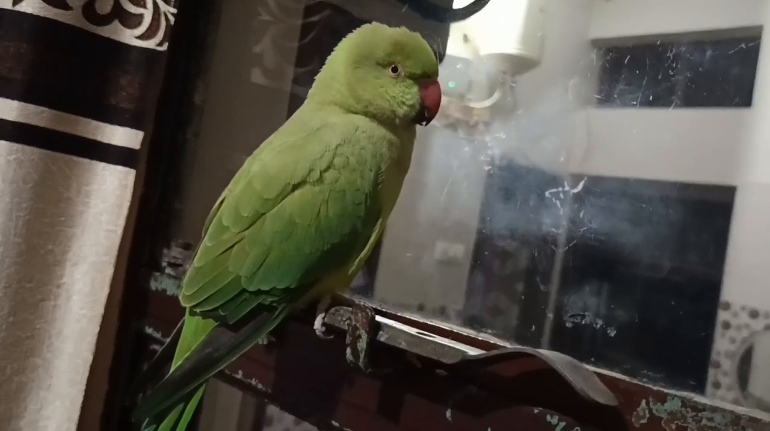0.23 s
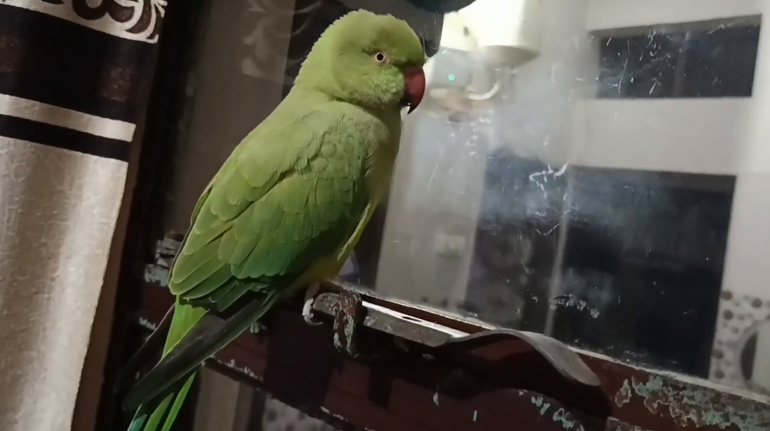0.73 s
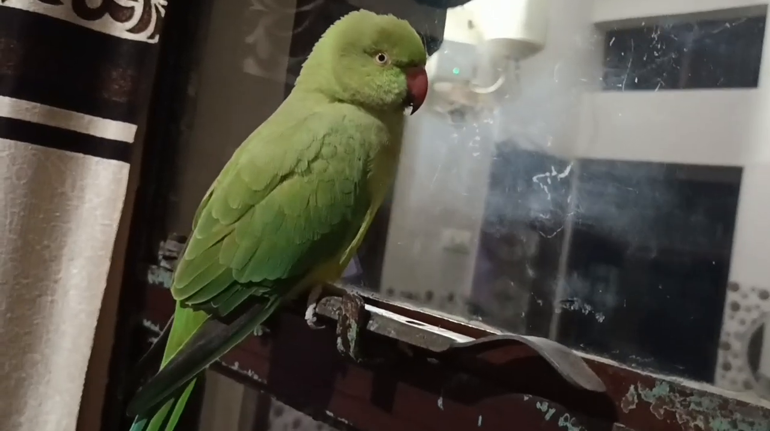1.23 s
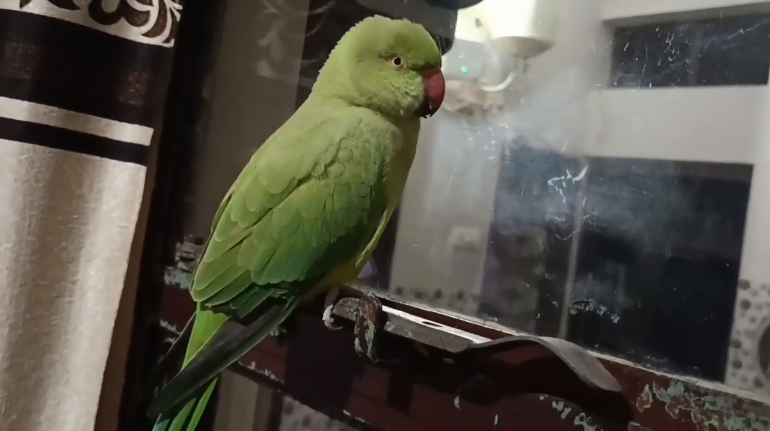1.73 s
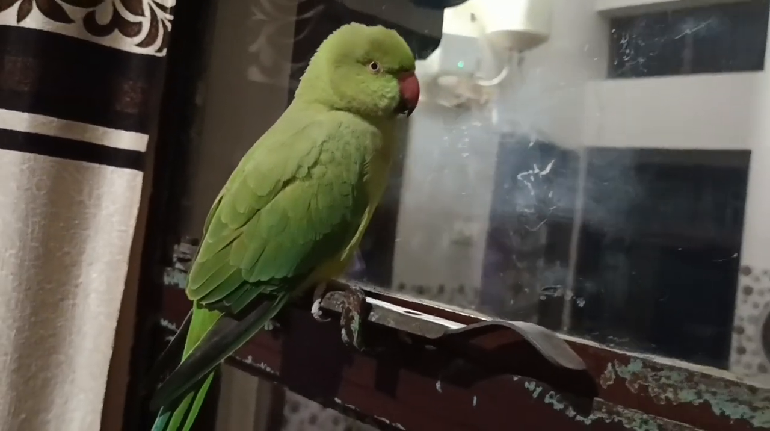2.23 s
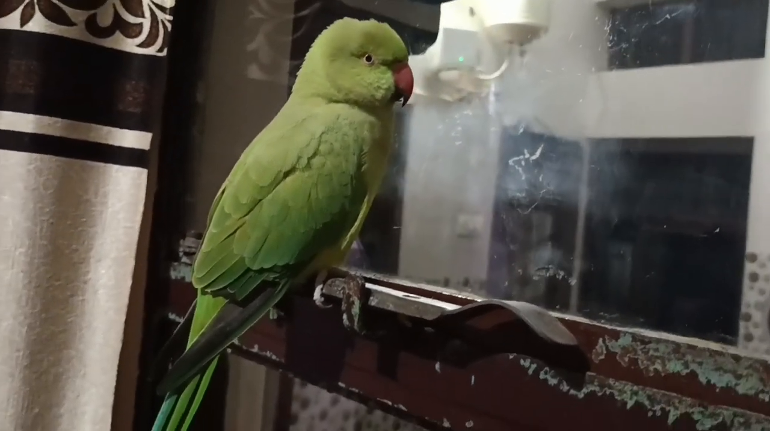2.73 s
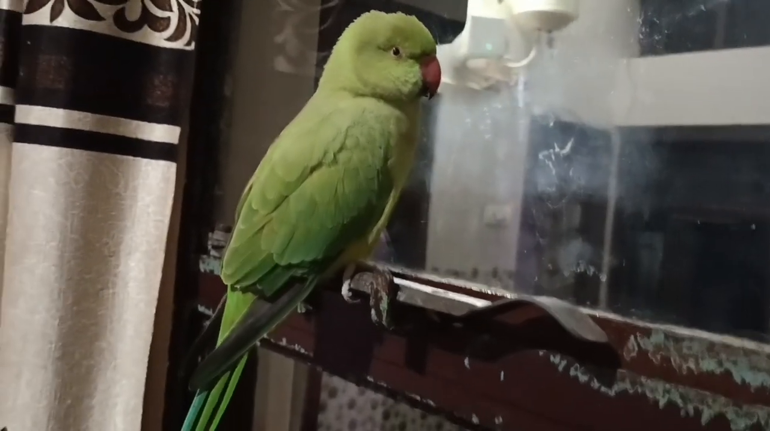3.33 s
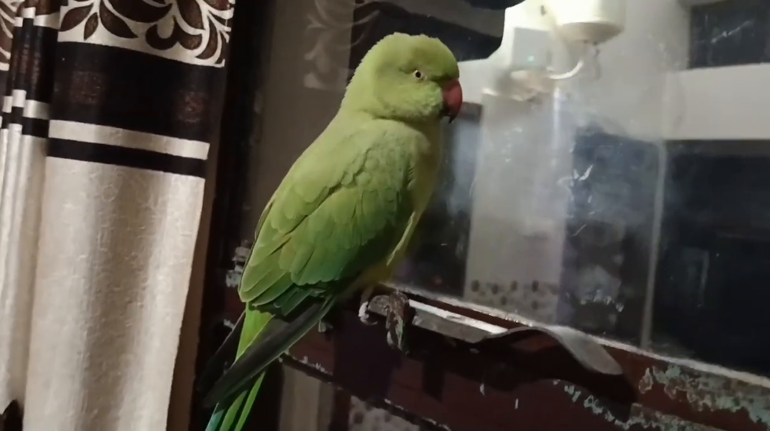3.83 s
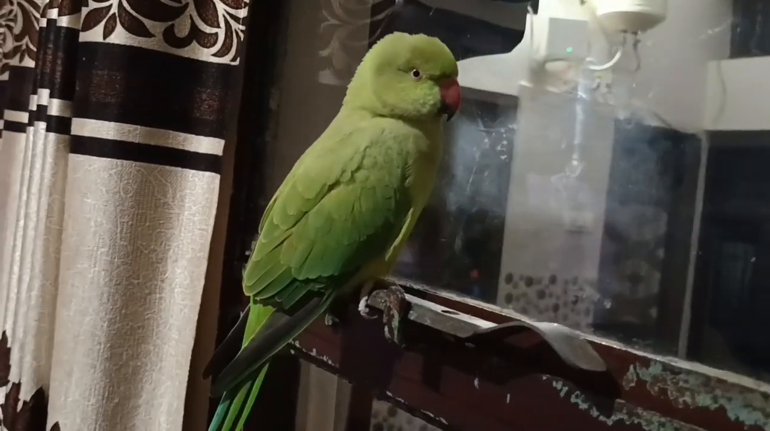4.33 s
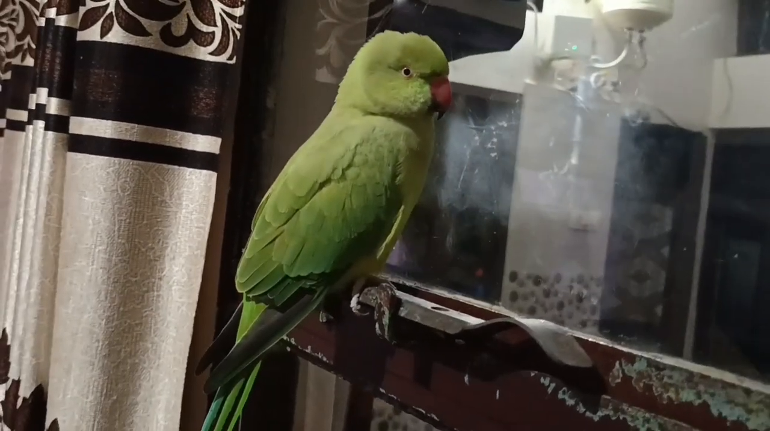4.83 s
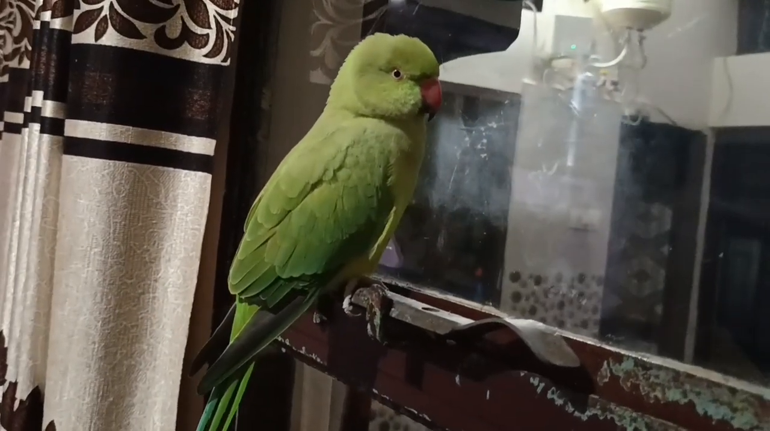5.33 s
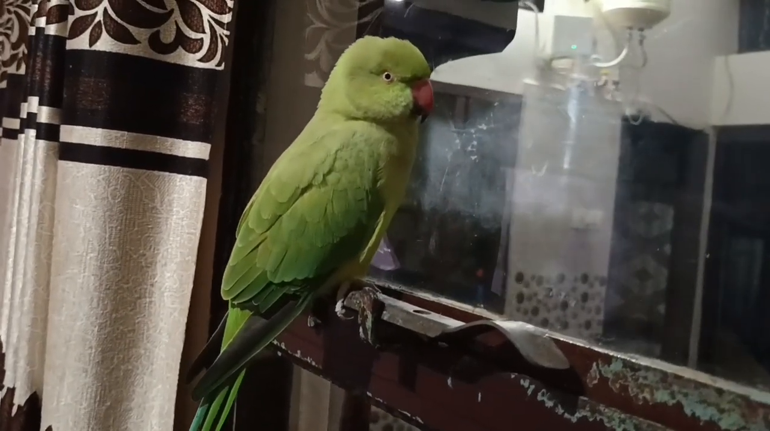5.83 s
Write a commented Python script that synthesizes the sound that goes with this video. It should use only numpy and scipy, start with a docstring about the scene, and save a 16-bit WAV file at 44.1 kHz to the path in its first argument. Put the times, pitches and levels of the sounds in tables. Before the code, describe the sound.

A parakeet indoors gives clear nasal calls, a harsh fluttering squawk, wheezes and a scooped whistle, with beak clicks over faint room rumble.

```python
"""A clear nasal parakeet note sounds first, over a low household rumble; three more notes, a fluttering squawk,
a scooped whistle, wheezes, pips, short knocks and beak clicks follow. Voiced calls are harmonic series whose
partials are weighted by beak resonances, wheezes are noise pulsed by the tongue, clicks are impulses ringing
resonances, pips and short knocks are windowed sinusoids.
A window pane behind the bird makes left and right differ, and a small room adds a decaying tail."""
import sys
import numpy as np
from scipy import signal
from scipy.fft import rfft, irfft, next_fast_len
from scipy.io import wavfile
from scipy.ndimage import uniform_filter1d, map_coordinates

SR = 44100
rng = np.random.default_rng(int(sys.argv[2]) if len(sys.argv) > 2 else 0)


def wrap_up_sound(samples):
    """Save the sound to the file named by the first command line argument, as 16-bit audio."""
    columns = np.atleast_2d(samples).T
    # keep every value between -1 and 1, then stretch to whole-number steps
    tamed = np.clip(columns, -1, 1)
    steps = np.round(tamed * 32767).astype(np.int16)
    wavfile.write(sys.argv[1], SR, steps)


N = 267687
TIME = np.arange(N) / SR  # s

# spectrum of the household noise, relative: f/Hz, level/dB
FLOOR = [(15, -62), (25, -32.5), (96, -0.5), (194, -2), (316, -7), (791, -10.5), (1180, -16), (2150, -22),
         (8270, -42), (10300, -35), (12500, -43.5), (15800, -51.5)]
# left-right correlation of the household noise: f/Hz, correlation
ALIKE = [(60, .92), (180, .95), (350, .7), (600, .4), (1650, .06)]
FLOOR_DB, SETTLES_DB_PER_S = -45, -0.2  # starting level, and its slow fall

# answer of the room: f/Hz, decay time t60/s, level/dB
ROOM = [(500, 0.39, -8.5), (2400, 0.4, -12), (5000, 0.32, -9), (10500, 0.1615, -9), (14000, 0.05, -7.5)]
# effect of the pane behind the bird: f/Hz, left over right level/dB, left lead/rad
PORTS = [(612, -5.5, -1.1), (1062, 0.5, .65), (1200, 7.5, 0.94), (1720, 3.5, 0), (1900, 10.5, -.2),
         (2070, 7, -0.85), (2320, -2, -1.2), (2750, -6, -0.8), (3082, -10, .8), (3630, -6, 1),
         (4150, -0.5, 1.1), (4568, -3.5, 0.67), (5200, -7.5, 1.1), (6950, -16, -1.5), (9300, -2.5, -1.5),
         (10400, 9.5, -1), (13500, -0.5, -1.4)]
TOP_HZ = 15850  # upper band limit

# beak clicks: t/s, slip level/dB, knock level/dB, treble level/dB, loss per slip/dB
CLICKS = [(0.8417, -45.5, -38.5, -50, 6.5), (0.8707, -47.5, -59, -49.5, 4.5), (1.0005, -51, -67, -66, 10),
          (2.3874, -19.5, -21, -21.5, 3.5), (3.661, -63, -51, -66, 5), (4.0374, -47, -49.5, -52.5, 2.5),
          (4.2786, -47.5, -48, -50, 13), (4.866, -37.5, -35, -53, 3.5), (4.8953, -42, -42.5, -57, 12.5),
          (4.974, -46.5, -67, -58, 9), (5.2934, -46, -36.5, -62, 6), (5.6284, -22.5, -21.5, -24.5, 5.5),
          (5.654, -42.5, -40, -50, 5), (5.7054, -37, -36, -55.5, 5.5), (5.7164, -35.5, -41, -30.5, 0.5)]
# resonances of the beak, its tip and the hollow knock: f/Hz, width/Hz, level/dB
BEAK = [(4370, 220, 2), (7300, 1800, -7.5)]
TIP = [(10150, 270, 6.5), (12100, 1200, -2.5)]
KNOCK = [(560, 170, 5.5), (1800, 280, 2), (2680, 830, -21)]
DULL_HZ = 12500  # the clicks fall off above this
CLICK_ROOM_DB = -4  # clicks, pips and short knocks stir the room less than the voice
# pips and short knocks: centre t/s, f/Hz, level/dB, length/s
PIPS_AND_KNOCKS = [(0.201, 1473, -33.5, 0.043), (0.877, 1154, -41, 0.02), (1.224, 805, -36, 0.017),
                   (1.55, 796, -26.5, 0.017), (2.854, 1760, -22, 0.0059), (2.857, 835, -30.5, 0.0073),
                   (4.576, 1800, -56.5, 0.052), (4.579, 2525, -55, 0.04), (4.6, 3190, -63, .12),
                   (5.717, 889, -27, 0.011)]

# a brief high fizz: centre t/s, length/s, f/Hz, resonance width/Hz, level/dB
FIZZ = (4.552, .06, 10050, 800, -56)
# strands of breathy warble, first resonance: t/s, f/Hz, level/dB
WARBLE = [
    [(.917, 3110, -64), (.935, 2880, -54), (.99, 3660, -57), (1.026, 4250, -52), (1.045, 4550, -49.5),
     (1.058, 4050, -55.5)],
    [(1.035, 3270, -56.5), (1.082, 3280, -47.5), (1.1, 3400, -53), (1.148, 3290, -57), (1.176, 2740, -50.5),
     (1.195, 3100, -53.5)],
    [(1.082, 3950, -63), (1.106, 4470, -45.5), (1.142, 4000, -53.5), (1.165, 3540, -61.5)],
]
WARBLE_OVER_DB = [0, -14.5, -12.5]  # resonances at 1, 2 and 3 times the first
WARBLE_TOP_HZ = 10300
SLOPE_HZ_PER_DB = 36  # flanks of the first resonance; the higher ones are wider in step
# wheezes: t/s, length/s, rise/s, change from the risen level to the end/dB, upper level/dB, lower level/dB,
# lower resonance from f/Hz, to f/Hz, treble level/dB, treble shift/Hz
WHEEZES = [(1.595, 0.17, 0.008, -15.5, -37.5, -47, 3870, 3430, -51, -50.5),
           (2.679, 0.16, 0.018, -3, -58.5, -47.5, 3180, 2777, -52.5, -900),
           (5.082, .022, 0.0062, -4, -51, -73.5, 3103, 3100, -74, 602),
           (5.141, 0.033, 0.008, -10, -55, -61.5, 3003, 3037, -71.5, 595),
           (5.194, 0.04, 0.008, -7, -52, -61, 3290, 3290, -70, 601),
           (5.807, 0.135, 0.018, -6, -40.5, -54, 3270, 3670, -47, 101),
           (5.924, 0.087, 0.033, -8, -38, -48, 3610, 3660, -44.5, 294),
           (5.996, 0.086, 0.025, -1.5, -39.5, -52, 3700, 3600, -50, 394.5)]
# colour of a wheeze's upper band: f/Hz, level/dB
WHEEZE_COLOUR = [(3300, -23), (3900, -6), (4300, 1), (4600, 4.5), (4950, -14.5), (5300, -37.5)]
# treble colour of wheezes and squawk: f/Hz, level/dB
TREBLE = [(5600, -18.5), (6300, -10), (7000, 2.5), (7900, -18.5), (8900, -12.5), (10800, -15),
          (12500, -22.5)]
SETS_IN_DB = -15  # start of a wheeze under the level reached after the rise
BUZZ_HZ, BUZZ_SHARE = 282, 0.63  # rate of the tongue's flaps; their pulses over the hiss
WANDER_HZ, TREBLE_WANDER_HZ, SWELL_DB = 45, 130, 1.6  # the beak never holds still

# squawk: t/s, top of the pitch swing f/Hz, level/dB, overtones over the level/dB
SQUAWK = [(1.257, 1793, -24.5, -31), (1.266, 1814, -19, -16), (1.322, 1877, -16.5, -10),
          (1.356, 1859, -15.5, -7), (1.372, 1713, -17, -6), (1.423, 1811, -15.5, -6.5),
          (1.46, 1851, -16, -18), (1.487, 1657, -25, -32), (1.506, 1676, -17, -26),
          (1.532, 2090, -12.5, -28), (1.545, 2360, -9, -24), (1.558, 2500, -11, -17.5)]
# bounces of the second membrane: t/s, bounces per second
FLUTTER = [(1.257, 180), (1.29, 170), (1.444, 160), (1.558, 160)]
# single chirps: t/s, peak level/dB
STUTTER = [(1.181, -36), (1.1922, -36), (1.2032, -28.5), (1.2122, -23.5), (1.223, -18.5), (1.2328, -28),
           (1.2424, -21.5)]
# colour of the squawk's overtones: f/Hz, level/dB
OVERTONES = [(2400, -9.5), (3000, 0), (3500, 4), (4200, 7.5), (4800, -1), (5500, -20), (6200, -18.5),
             (7000, -35.5)]
# what the squawk's tone passes through: f/Hz, level/dB
THROAT = [(600, -50), (1050, -6), (1250, 0), (2600, 0), (3300, -30)]
SWING = 0.33  # depth of the pitch swing over its top
TIGHT_HZ, TIGHT_SPAN_HZ = 1890, 503  # above this the strength drops ever less at a bounce
EDGE_HZ, EDGE_GROWS, BELOW_YIELDS = 3700, 1.1, 0.3  # overtones above the edge gain, those below yield, dB per dB
SQUAWK_RING_GROWS = 3.06  # the beak ring swings wider than the level, dB per dB

# weight of the middle partials: f/Hz, level/dB
MIDDLE = [(3900, 8), (4900, -10.5), (5500, -5.5), (6400, -27.5), (8500, -27), (9600, -40), (12800, -27),
          (13800, -57.5), (15500, -36.5)]
# the beak ring: f/Hz, level/dB
RING = [(8000, -38), (9000, -16), (9900, -5), (10600, -3.5), (11300, -10), (12000, -24), (14000, -39.5)]
# colour of the air rasp: f/Hz, level/dB
RASP = [(600, -25.5), (1500, -8.5), (2300, 4.5), (3500, -1), (4800, -20), (5800, -9.5), (6800, -13),
        (8000, -37.5), (9300, -10), (11000, -37.5), (13000, -38)]

# whistle: t/s, pitch f/Hz, level/dB
WHISTLE = [(5.48, 2123, -43.5), (5.492, 2007, -20.5), (5.574, 1745, -17.5), (5.602, 1735, -21.5),
           (5.706, 1711, -18), (5.79, 1840, -19.5), (5.85, 1909, -15.5), (5.868, 2052, -11),
           (5.884, 2132, -10), (5.894, 2365, -21.5), (5.902, 2337, -38)]
WHISTLE_LOW_HZ, PURE_DB = 1797, -43  # overtones under the tone at the low pitch
HARDENS_DB_PER_HZ, HARDEST_DB = 0.8, 9.5  # they gain as the pitch tightens, up to a limit
WHISTLE_THIRD_DB, WHISTLE_FOURTH_DB = -2.5, -5  # over the second partial
WHISTLE_RING_DB, WHISTLE_RASP_DB = -17.5, -47  # over the tone
WHISTLE_RING_GROWS, WHISTLE_EASY_DB = 1.38, -15  # extra ring per dB over an easy level

# nasal notes: t/s, second partial f/Hz, its level/dB, brightness over it/dB, beak ring over it/dB
NOTES = [
    [(0.0, 2020, -25, -16.5, -14.5), (0.014, 2072, -21.5, -11.5, -28), (0.036, 2168, -20.5, -12.5, -30),
     (0.098, 2063, -20, -14.5, -32), (0.176, 2118, -23, -10, -28.5), (0.248, 2137, -19.5, -12.5, -29.5),
     (0.322, 2151, -16.5, -13, -27.5), (0.342, 2113, -21, -10, -28.5), (0.39, 2113, -17.5, -10.5, -32),
     (0.405, 2018, -28.5, -15.5, -28)],
    [(1.742, 2076, -38.5, -13, -24), (1.752, 1968, -27.5, -27, -32), (1.852, 2111, -30, -12, -40.5),
     (1.942, 2174, -30, -14, -36.5), (1.984, 2148, -29.5, -8, -41), (2.018, 2223, -26.5, -9, -43),
     (2.084, 2247, -25, -6.5, -40.5), (2.156, 2115, -23, -9, -36), (2.18, 2132, -18.5, -12.5, -25.5),
     (2.2, 2062, -12.5, -39.5, -20), (2.228, 2035, -18, -35.5, -14), (2.246, 2190, -11.5, -28, -12.5),
     (2.26, 2164, -9, -21, -19), (2.27, 2450, -20, -26, -14), (2.277, 2030, -26.5, -33, -21)],
    [(2.456, 2214, -38.5, -16.5, -23.5), (2.464, 2090, -29, -14, -35), (2.504, 2184, -28, -4, -35),
     (2.52, 1997, -32, -12, -25), (2.558, 2104, -25, -13.5, -30.5), (2.574, 2180, -19.5, -9, -26.5),
     (2.596, 2080, -12, -34, -18), (2.616, 2113, -12.5, -41.5, -15.5), (2.63, 2180, -16, -22.5, -9.5),
     (2.646, 2251, -7.5, -24.5, -14), (2.658, 2125, -10.5, -21.5, -14), (2.668, 2440, -21.5, -33, -20.5)],
    [(2.82, 2167, -32.5, -35, -24), (2.836, 2077, -28, -18.5, -36), (2.876, 2044, -25.5, -17, -29),
     (2.888, 2120, -22, -15.5, -30), (2.898, 2204, -22, -9, -31), (2.93, 2244, -18, -6.5, -37.5),
     (2.948, 2265, -14, -9.5, -46.5), (3.056, 2339, -16.5, -12.5, -33.5), (3.13, 2372, -16, -9, -32),
     (3.208, 2414, -16.5, -6.5, -31), (3.312, 2414, -15, -5.5, -38.5), (3.326, 2381, -15, -6, -38),
     (3.335, 2670, -31.5, -24.5, -23.5)],
]
# voice of each note: hoarse time/s, rasp level while hoarse/dB, rasp level once clear/dB (at the easy level),
# level of the partials in between/dB, first partial level/dB (at the easy level)
ONSETS = [(0.2, -46, -54, -72, -22), (.272, -43, -50.5, -30.5, -24), (0.094, -41, -44.5, -45, -23.5),
          (.047, -46.5, -56, -35.5, -23.5)]
# while hoarse, each note's pattern repeats after this many cycles
PERIODS = [2, 2, 3, 3]
# the hoarse pattern breaks up into rasp: centre t/s, half length/s
BREAKS = [(1.789, 0.0043), (1.839, 0.0085), (1.861, 0.0027), (1.875, 0.0034), (1.896, 0.0024),
          (1.985, .011), (2.48, 0.01408), (2.532, .004)]
# partials in between, from below the first partial upward, one partial lower when tripled: level/dB
BETWEEN = [-21.5, -14, -7, -2.5, -15.5, -24]
# third partial over the brightness: f/Hz, level/dB
THIRD = [(3050, 12), (3300, 6.5), (3500, 2), (3650, -8)]
EASY_DB, FIRST_GROWS, RASP_GROWS = -18, 0.74, 0.4  # first partial and clear rasp, dB per dB over the easy level
CLEARS_S = 0.0119  # the hoarse start fades out in this time
STEADY_DB, UNSTEADY_DB = 0.5, 0.24  # shimmer of the partials, clear and extra while hoarse
WAVERS_DB, WAVERS_PER_S = 2.5, 70  # while hoarse the rasp keeps wavering against the tone
BREAK_LINES_DB, BREAK_RASP_DB = -22.5, 5.5  # effect of a break on the partials in between and on the rasp
HOARSE_RING_DB = -6  # hoarseness dulls the beak ring
LURCH, LURCH_FULL_DB = 0.01, -40  # share of pitch, in full once the partials in between reach this level
RING_UP_HZ, CLOSES_S = 595, 0.05  # the open beak rings higher and sinks back as it closes at a note's end
RING_AIR_DB, CLOSING_AIR_DB = -22.5, 13  # air in the ring, and more of it while closing


def amp(db):
    """Level definition: dB to amplitude ratio."""
    return 10 ** (np.asarray(db) / 20)


def unit(x):
    """Normalization to an rms of 1."""
    return x / np.sqrt(np.mean(x ** 2) + 1e-20)


def along(points, hz):
    """Interpolation of a table's columns over logarithmic frequency."""
    f, *columns = np.transpose(points)
    return np.squeeze([np.interp(np.log(hz + 1), np.log(f + 1), c) for c in columns])


def colour(points):
    """Zero-phase frequency response with the levels of a table."""
    return lambda f: amp(along(points, f))


def span(rows):
    """Time windowing: the samples a table covers, its columns on them, and a gate with soft ends."""
    s, *columns = np.transpose(rows)
    where = slice(max(round(s[0] * SR), 0), min(round(s[-1] * SR), N))
    t = TIME[where]
    gate = np.clip(np.minimum((t - s[0]) / 0.00063, (s[-1] - t) / 0.004), 0, 1)
    return where, [np.interp(t, s, c) for c in columns], gate


def wobble(rate, size):
    """Slow random modulation: a smooth curve through `rate` random knots a second."""
    knots = rng.standard_normal(int(size * rate / SR) + 4)
    return map_coordinates(knots, [np.arange(size) * rate / SR])


def filtered(x, response):
    """Linear filtering: the spectrum of x times a complex response of frequency."""
    m = next_fast_len(N + SR // 2)
    return irfft(rfft(x, m) * response(np.fft.rfftfreq(m, 1 / SR)), m)[..., :N]


def phase(hz):
    """Phase in rad as the running integral of frequency."""
    return 2 * np.pi * np.cumsum(hz) / SR


def shifted(x, by):
    """Single-sideband modulation: every frequency moves by a changing number of Hz."""
    return np.real(signal.hilbert(x) * np.exp(1j * phase(by)))


def resonances(modes):
    """Superposition of second-order resonances with alternating sign."""
    def response(f):
        total = 0
        for k, (centre, width, db) in enumerate(modes):
            damping = 1j * f * width
            total = total + (-1) ** k * amp(db) * damping / (centre * centre - f * f + damping)
        return total
    return response


def household():
    """Partly coherent noise: steady rumble and hiss, alike at both ports only in the bass, drifting in patches."""
    z = signal.stft(rng.standard_normal((2, N + 512)), nperseg=512)[2]
    patches = uniform_filter1d(rng.standard_normal(z.shape[1:]), size=5, axis=0)
    patches = uniform_filter1d(patches, size=10, axis=1)
    pair = signal.istft(z * amp(2.0 * unit(patches)), nperseg=512)[1][:, :N]

    def mid_side(hz):
        angle = np.arccos(np.clip(along(ALIKE, hz), -1, 1)) / 2  # this split gives the wanted correlation
        return amp(along(FLOOR, hz)) * [np.cos(angle), np.sin(angle)]

    mid, side = filtered(pair, mid_side)
    return amp(FLOOR_DB + SETTLES_DB_PER_S * TIME) * unit(np.array([mid + side, mid - side]))


def room(x):
    """Reverberation: each frequency of the tail has its own strength and exponential decay."""
    hz, t, z = signal.stft(rng.standard_normal((2, SR // 2)), SR, nperseg=256)
    t60, db = along(ROOM, hz)[..., None]
    tail = signal.istft(z * amp(db - 60 * t / t60) * np.sqrt(14 / t60 / SR), SR, nperseg=256)[1]
    delayed = np.pad(x, (300, 0))  # samples before the answer starts
    return signal.fftconvolve(delayed[None], tail, axes=1)[:, :N]


def ports(x):
    """Interaural difference: left and right differ in level and phase as a function of frequency."""
    def pair(hz):
        db, lead = along(PORTS, hz)
        ratio = amp(db) * np.exp(1j * lead)
        return 2 * np.array([ratio, np.ones_like(ratio)]) / (1 + ratio)
    return filtered(x, pair)


def pips_and_knocks():
    """Windowed sinusoids: brief tones and a hollow knock."""
    out = np.zeros(N)
    for s, hz, db, length in PIPS_AND_KNOCKS:
        t = np.arange(round(length * SR)) / SR
        tone = np.hanning(len(t)) * np.sin(2 * np.pi * hz * t)
        out[round((s - length / 2) * SR):][:len(t)] += amp(db) * tone
    return out


def beak_clicks():
    """Impulse excitation: an uneven train of slips of the beak halves rings its resonances and a hollow knock."""
    slips, tips, knocks = np.zeros((3, N))
    count = np.arange(5)
    for s, db, knock_db, tip_db, loss_db in CLICKS:
        uneven_s = 0.00018 * rng.standard_normal(5)
        start = np.round((s + 0.0017 * count + uneven_s) * SR).astype(int)
        fade_db = 1.5 * rng.standard_normal(5) - loss_db * count
        # the added dB make up for the small response of a resonance to one impulse
        slips[start] = amp(db + 24 + fade_db)
        tips[start] = amp(tip_db + 19 + fade_db)
        knocks[start - 30] = amp(knock_db + 29 + fade_db)
    clicks = filtered(slips, resonances(BEAK)) + filtered(tips, resonances(TIP))
    clicks += filtered(knocks, resonances(KNOCK))
    return filtered(clicks, lambda f: 1 / (1 - (f / DULL_HZ) ** 2 + 1j * f / DULL_HZ))


def fizz():
    """Narrow-band noise: a doubled resonance under a bell-shaped envelope."""
    s, length, hz, width, db = FIZZ
    band = unit(filtered(rng.standard_normal(N), lambda f: resonances([(hz, width, 0)])(f) ** 2))
    return amp(db) * band * np.exp(-(3 * (TIME - s) / length) ** 2)


def tongue_air():
    """Flow modulation: the tongue flaps in the air stream, giving pulses and hiss to be coloured by a response."""
    flaps = np.cumsum(BUZZ_HZ * (1 + 0.05 * wobble(25, N) + 0.03 * wobble(300, N))) / SR
    pulses = unit(np.diff(np.floor(flaps), prepend=0) * amp(1.9 * rng.standard_normal(N)))

    def coloured(response):
        flow = amp(1.14 * wobble(45, N)) + 0.28 * np.cos(2 * np.pi * flaps)
        hiss = flow * rng.standard_normal(N)
        return unit(filtered(hiss + BUZZ_SHARE * pulses, response))

    return coloured


def flank(k):
    """Envelope of the k-th sliding resonance: level falls linearly with distance from its centre."""
    return lambda f: (f > 20) * amp(-f / (k * SLOPE_HZ_PER_DB))


def warble():
    """Amplitude modulation of sliding carriers: slow buzzing noise placed at a resonance and its multiples."""
    out = np.zeros(N)
    air = tongue_air()
    slow = [air(flank(k)) for k in (1, 2, 3)]
    for strand in WARBLE:
        where, (hz, level_db), gate = span(strand)
        for k, db in enumerate(WARBLE_OVER_DB, 1):
            gain = amp(level_db + db) / (1 + (k * hz / WARBLE_TOP_HZ) ** 20)
            out[where] += gate * gain * np.sqrt(2) * slow[k - 1][where] * np.cos(k * phase(hz))
    return out


def wheezes():
    """Turbulence noise: air forced past the tongue buzzes and hisses in drifting beak resonances."""
    out = np.zeros(N)
    air = tongue_air()
    upper, treble, slow = air(colour(WHEEZE_COLOUR)), air(colour(TREBLE)), air(flank(1))
    drift, swell = wobble(14, N), amp(SWELL_DB * wobble(20, N))
    for s, length, rise, change_db, upper_db, lower_db, from_hz, to_hz, treble_db, shift in WHEEZES:
        where, (hz,), gate = span([(s, from_hz), (s + length, to_hz)])
        knots_s = [0, min(rise, length / 2), 0.65 * length, length]
        course_db = np.interp(TIME[where] - s, knots_s, [SETS_IN_DB, 0, change_db / 4, change_db])
        breath = amp(upper_db) * shifted(upper[where], WANDER_HZ * drift[where])
        breath += amp(lower_db) * np.sqrt(2) * slow[where] * np.cos(phase(hz))
        breath += amp(treble_db) * shifted(treble[where], shift + TREBLE_WANDER_HZ * drift[where])
        out[where] += gate * swell[where] * amp(course_db) * breath
    return out


def stutter():
    """Linear frequency sweep: the voice catches in single rising chirps before it runs."""
    out = np.zeros(N)
    t = np.arange(round(0.005 * SR)) / SR
    turn = 2 * np.pi * (1600 * t + 70000 * t * t)
    chirp = np.hanning(len(t)) * (np.sin(turn) + 0.02 * np.sin(2 * turn) + 0.025 * np.sin(3 * turn))
    for s, db in STUTTER:
        out[round(s * SR):][:len(t)] += amp(db) * chirp
    return out


def squawk():
    """Joint frequency and amplitude modulation: a second membrane bounces against the tone.

    At each bounce pitch and strength drop sharply; the overtones swing wider than the tone."""
    where, (top, level_db, over_db), gate = span(SQUAWK)
    size = len(top)
    rate = np.interp(TIME[where], *np.transpose(FLUTTER))
    beat = phase(rate * (1 + 0.045 * wobble(90, size))) / 2  # half a turn per bounce
    lift = np.abs(np.sin(beat))

    dip = SWING * top * amp(0.5 * wobble(80, size)) * (1 - lift ** 1.5)
    turn = phase(top - dip + 25 * wobble(400, size) + 14 * wobble(60, size))
    tight = np.clip((top - TIGHT_HZ) / TIGHT_SPAN_HZ, 0, 1)
    strength = (0.22 + 2 * tight + np.abs(np.sin(beat + 0.22)) ** 0.8) / (1 + 2 * tight)
    tone = unit(strength * amp(0.6 * wobble(500, size)) * np.cos(turn))

    overtones = np.zeros(N)
    partials = np.cos(2 * turn) + np.cos(3 * turn) + 0.7 * np.cos(4 * turn)
    overtones[where] = amp(1.4 * wobble(580, size)) * (partials + 0.55 * rng.standard_normal(size))

    def split(f):
        above = 1 / (1 + (EDGE_HZ / (f + 1)) ** 8)
        return amp(along(OVERTONES, f)) * [1 - above, above]

    low, high = filtered(overtones, split)[:, where]
    under_db = over_db.max() - over_db
    over = (amp(BELOW_YIELDS * under_db) * low + amp(-EDGE_GROWS * under_db) * high) / np.std(low + high)

    ring_air = filtered(rng.standard_normal(N), lambda f: amp(along(RING, f)) + 0.36 * amp(along(TREBLE, f)))
    ring = unit(ring_air)[where] * (1.1 + lift)

    out = np.zeros(N)
    out[where] = gate * amp(level_db) * tone
    out = filtered(out, colour(THROAT))
    out[where] += gate * (amp(level_db + over_db) * over + amp(SQUAWK_RING_GROWS * level_db) * ring)
    return out


def call_air():
    """Filtered noise: air in the colours of the rasp and of the beak ring."""
    return np.array([unit(filtered(rng.standard_normal(N), colour(table))) for table in (RASP, RING)])


def voice(hz, levels, air, shimmer_db, ring_up_hz, ring_air_db):
    """Harmonic series: lowest partials free, the rest weighted by a middle group and the beak ring.

    Air rasps once a cycle."""
    *low_db, middle_db, ring_db, rasp_db = levels
    size = len(hz)
    # much air for little tone shakes the pitch, which blurs high partials first
    shaken = np.clip(amp(rasp_db - np.maximum(*low_db[:2])), 0, 0.4)
    jitter = 0.002 * wobble(60, size) + 0.003 * wobble(220, size) + 0.02 * shaken * wobble(500, size)
    turn = phase(hz * (1 + jitter))
    out = (amp(rasp_db) * air[0] + amp(ring_db + ring_air_db) * air[1]) * (1 + 0.77 * np.cos(turn))
    for k in range(1, 16):
        if k <= len(low_db):
            gain = amp(low_db[k - 1])
        else:
            gain = amp(middle_db + along(MIDDLE, k * hz)) + amp(ring_db + along(RING, k * hz - ring_up_hz))
        gain = gain * amp(shimmer_db * np.sqrt(k) * wobble(60, size)) * (k * hz < SR / 2)
        out += np.sqrt(2) * gain * np.cos(k * turn - 0.25 * k * k)
    return out, turn


def whistle():
    """Nearly pure tone: a scooped fundamental whose weak overtones harden as the pitch tightens."""
    out = np.zeros(N)
    where, (hz, level_db), gate = span(WHISTLE)
    hardening_db = np.clip(HARDENS_DB_PER_HZ * (hz - WHISTLE_LOW_HZ), 0, HARDEST_DB)
    over_db = level_db + PURE_DB + hardening_db
    ring_db = level_db + WHISTLE_RING_DB + WHISTLE_RING_GROWS * (level_db - WHISTLE_EASY_DB)
    levels = [level_db, over_db, over_db + WHISTLE_THIRD_DB, over_db + WHISTLE_FOURTH_DB,
              over_db, ring_db, level_db + WHISTLE_RASP_DB]
    stack, _ = voice(hz, levels, call_air()[:, where], shimmer_db=-0.2, ring_up_hz=0, ring_air_db=-19)
    out[where] = gate * stack
    return out


def subharmonics(turn, period):
    """Period multiplication: partials between the harmonics, at multiples of 1/period of the pitch."""
    total = 0
    for order in [j / period for j in range(1, 6 * period) if j % period]:
        db = np.interp(order, np.arange(6) + 5 / 2 - period, BETWEEN)
        total = total + amp(db + 1.5 * wobble(80, len(turn))) * np.cos(order * turn)
    return total


def nasal_notes():
    """Bifurcating oscillation: notes set in hoarse, the syrinx doubling or tripling its period, then turn clear."""
    out = np.zeros(N)
    air = call_air()
    for note, onset, period in zip(NOTES, ONSETS, PERIODS):
        hoarse_s, hoarse_db, clear_db, half_db, first_db = onset
        where, (second_hz, level_db, bright_db, ring_db), gate = span(note)
        t, size = TIME[where], len(gate)
        effort_db = level_db - EASY_DB
        rough = np.clip((note[0][0] + hoarse_s - t) / CLEARS_S, 0, 1)
        waver_db = rough * WAVERS_DB * wobble(WAVERS_PER_S, size)
        broken = sum(np.exp(-((t - s) / half_s) ** 2) for s, half_s in BREAKS)
        half = rough * amp(half_db - waver_db + BREAK_LINES_DB * broken)

        clear_db = clear_db + RASP_GROWS * effort_db
        rasp_db = clear_db + rough * (hoarse_db - clear_db) + waver_db + BREAK_RASP_DB * broken
        middle_db = level_db + bright_db
        third_db = middle_db - waver_db / 2 + along(THIRD, 3 * second_hz / 2)
        levels = [first_db + FIRST_GROWS * effort_db, level_db, third_db,
                  middle_db, level_db + ring_db + HOARSE_RING_DB * rough, rasp_db]

        lurch = LURCH * rough * min(amp(half_db - LURCH_FULL_DB), 1) * np.tanh(2 * wobble(WAVERS_PER_S, size))
        closing = np.clip(1 - (note[-1][0] - t) / CLOSES_S, 0, 1)
        stack, turn = voice(second_hz / 2 * (1 + lurch), levels, air[:, where],
                            shimmer_db=STEADY_DB + UNSTEADY_DB * rough,
                            ring_up_hz=RING_UP_HZ * (1 - closing),
                            ring_air_db=RING_AIR_DB + CLOSING_AIR_DB * closing)
        out[where] += gate * (stack + half * subharmonics(turn, period))
    return out


def scene():
    """Superposition of the household noise, the room's answer and the direct sound of the bird."""
    background = household()
    small = pips_and_knocks() + beak_clicks()
    bird = fizz() + warble() + wheezes() + stutter() + squawk() + whistle() + nasal_notes()
    return background + room(bird + amp(CLICK_ROOM_DB) * small) + ports(bird + small)


def record(dry):
    """Band limitation: nothing at or above TOP_HZ is kept."""
    return filtered(dry, lambda hz: hz < TOP_HZ)


dry = scene()
out = record(dry)
wrap_up_sound(out)
```